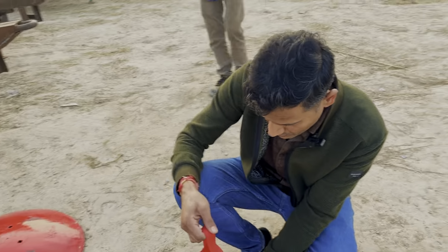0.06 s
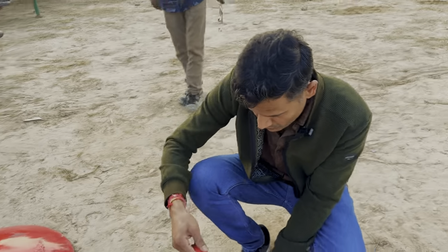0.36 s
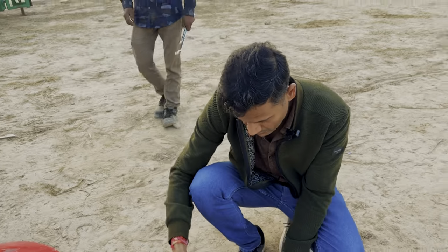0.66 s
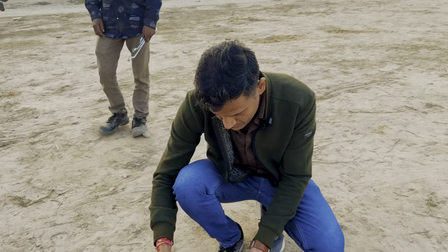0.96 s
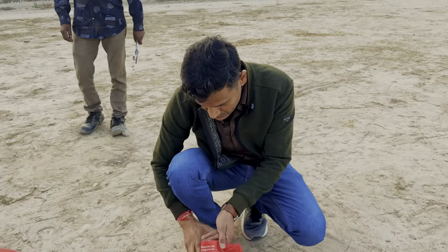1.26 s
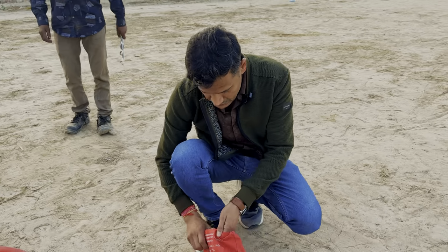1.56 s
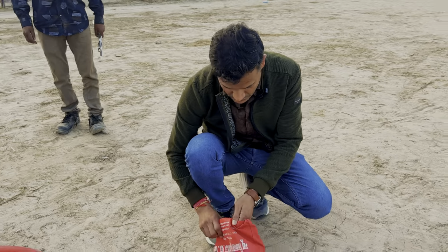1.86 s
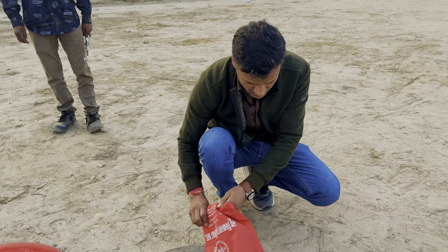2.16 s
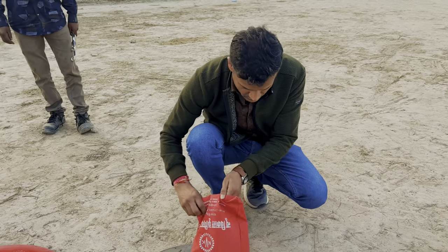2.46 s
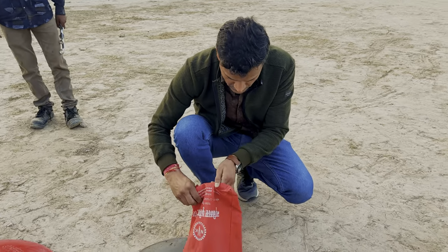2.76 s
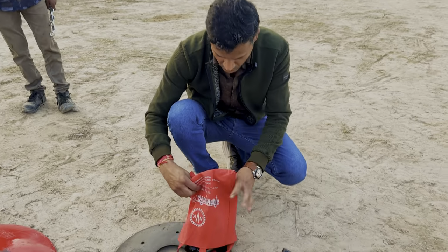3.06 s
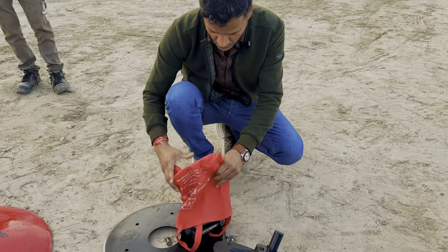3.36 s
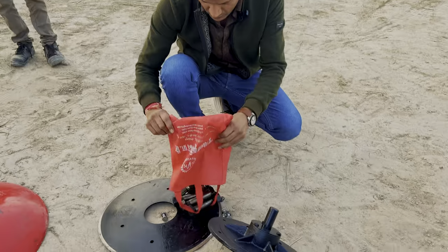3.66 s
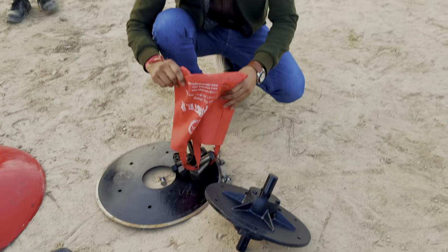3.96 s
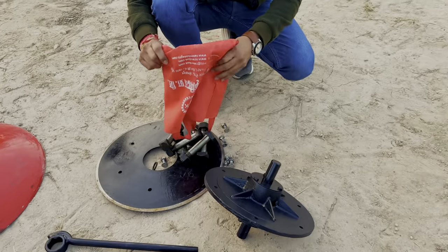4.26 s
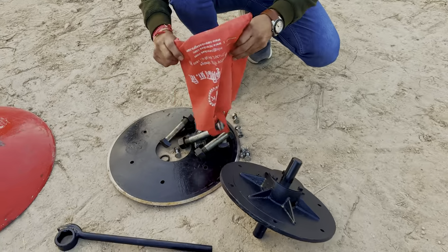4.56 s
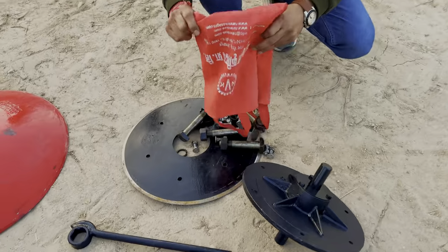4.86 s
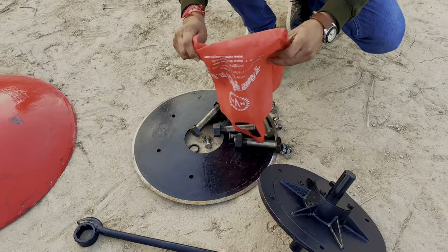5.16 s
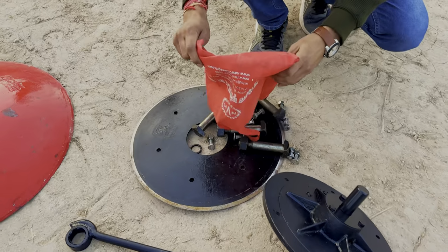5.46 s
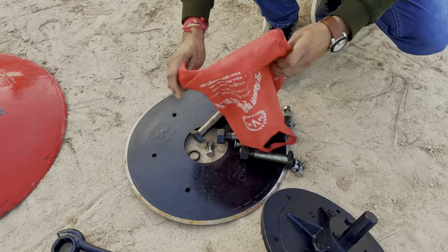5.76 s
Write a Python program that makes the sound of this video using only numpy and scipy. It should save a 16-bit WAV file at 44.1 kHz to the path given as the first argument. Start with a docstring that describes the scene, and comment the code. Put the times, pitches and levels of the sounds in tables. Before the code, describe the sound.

The sound is close and dry, over faint, steady outdoor air. A cloth bag is handled with a soft low bump at about 0.3 seconds. Nuts tick sharply inside it near 0.85 seconds, and the load slides with a rustle and a brief, thin, high squeak. Between 1.1 and 1.4 seconds the first steel pieces drop onto a steel disc, clinking and ringing briefly. After a near pause, a bright clink comes at 2.4 seconds, then heavier bolts clank from 2.7 to 3 seconds, followed by lighter clinks. At 3.7 seconds the bag rustles and squeaks again, and bolts, nuts and washers pour out in a dense, jingling clatter, loudest around 4.8 seconds. The ring shortens as the heap grows. After a short lull with soft handling bumps, a last burst of clanks falls from 5.3 to 5.7 seconds.

```python
"""Outdoors, on sandy ground: steel bolts, nuts and washers are shaken from a cloth bag onto a steel disc.
The load shifts and squeals in the bag; the pieces drop, chatter on the disc and on each other,
and set both ringing. The growing heap damps the ring. Handling adds soft bumps and a low rumble.
A limiter catches the loudest blows."""
import sys
import numpy as np
from scipy import signal
from scipy.fft import rfft, irfft, next_fast_len
from scipy.io import wavfile
from scipy.ndimage import uniform_filter1d, minimum_filter1d

SR = 44100
rng = np.random.default_rng(int(sys.argv[2]) if len(sys.argv) > 2 else 0)


def to_wav(sig):
    """Store sig (one row per channel, or 1-D mono) as 16-bit WAV at the path in sys.argv[1].

    Samples outside -1..1 are clipped; the rate is SR.
    """
    pcm = np.clip(np.atleast_2d(sig), -1, 1) * 32767
    pcm = np.round(pcm).astype(np.int16)
    wavfile.write(sys.argv[1], SR, pcm.T)  # frames by channels


N = 264642
RING_N = int(.55 * SR)   # samples per event
RING_T_S = np.arange(RING_N) / SR
GRAZE_S = .009   # first touch to landing

# outdoor air: (frequency [Hz], relative density [dB])
AIR_SPECTRUM = [(25, 1.5), (60, 0), (140, -2), (280, -5), (500, -7), (1000, -12), (1600, -19.5),
                (3200, -24), (5300, -32), (9000, -25.5), (15500, -30)]
# hands shift the bag: (start [s], length [s], level [dB])
BAG_GRIPS = [(.3, 0.079, -52), (.92, .32, -52.5), (2.04, .34, -51), (3.18, 0.18, -45.5)]
# handling bumps: (time [s], peak [dB])
BAG_BUMPS = [(0.202, -32.5), (0.312, -18.5), (1.118, -28), (1.156, -23.5), (1.674, -36.5), (1.699, -38),
             (2.286, -31), (2.719, -29), (2.768, -31), (3.162, -32.5), (4.779, -26), (4.888, -32.5),
             (5.128, -34), (5.495, -31), (5.652, -36), (5.773, -32.5)]
# load slides in the bag: (start [s], length [s], rustle level [dB])
LOAD_SLIDES = [(.38, 0.016, -63), (0.715, 0.072, -49.5), (0.887, 0.59, -46.5), (1.672, 0.023, -59),
               (2.258, 0.032, -49.5), (3.27, 0.043, -62), (3.67, .58, -46)]
# cloth rustle: (frequency [Hz], relative density [dB])
RUSTLE_SPECTRUM = [(300, -1), (1000, 2), (1900, 3.5), (2600, -14), (4500, 6.5), (8000, -6.5), (13000, -4.5),
                   (15500, -4)]
# steel on steel: (frequency [Hz], level at a usual slide [dB])
SQUEAL_TONES = [(8980, -51), (12620, -44.5)]
# a piece catches: (time [s], half width [s], level [dB], frequency [Hz])
SQUEAL_FLARES = [(.455, 0.016, -58, 8960), (0.991, 0.022, -28, 9020), (0.99, 0.029, -29, 12700),
                 (1.23, 0.013, -33.5, 12850), (2.254, .012, -49.5, 12370), (3.698, 0.0083, -19, 12980),
                 (4.287, 0.011, -23, 12700)]
# nuts tick in the bag: (time [s], peak [dB], frequency [Hz])
NUT_TICKS = [(0.1077, -43.5, 4390), (0.7004, -36, 8580), (0.7347, -28.5, 3700), (0.785, -28, 4700),
             (0.855, -12.5, 3680), (0.8666, -16, 3720), (0.9864, -31, 8500), (1.0331, -37, 8800),
             (1.6742, -40.5, 7540), (2.3275, -24.5, 3370), (3.9693, -11.5, 4600)]
# weak, dense modes of the heap: (frequency [Hz], relative density [dB])
HEAP_SPECTRUM = [(200, -22), (320, -13), (500, -4), (750, 6.5), (950, 8), (1250, -6.5), (1750, -9.5),
                 (2200, -10.5), (2600, -9), (3500, -14.5), (6000, -19.5), (9000, -15), (13000, -19.5),
                 (15500, -20)]
# large bolts: (frequency [Hz], relative level [dB], t60 [s])
BOLT_MODES = [(890, 2, .11), (2347, -3, .28), (2659, 0, .13), (2874, -3, .28), (3445, -5, .15),
              (4450, -2, .12), (4575, -3, .12), (4888, -6, .14), (5458, -6, .15), (6309, -13, .15),
              (7590, -12, .15), (7848, -4, .15), (8042, -6, .18), (8624, -5, .14), (8753, -6, .15),
              (9517, -4, .15), (9926, -7, .13), (10600, -8, .15), (11649, -6, .15), (12381, -10, .16),
              (13016, -8, .15), (14082, -7, .15), (14621, -5, .16), (15223, -11, .15)]
# steel disc: (frequency [Hz], relative level [dB], t60 [s])
DISC_MODES = [(735, -4, .14), (930, -2, .2), (1141, -1, .29), (1442, -5, .18), (1855, -7, .19),
              (2487, -1, .42), (2659, -2, .2), (3294, -5, .14), (4726, -12, .24), (5953, -15, .18),
              (6890, -11, .18), (7052, -11, .15), (8839, -4, .15), (9851, -6, .15), (10669, -10, .14),
              (10895, -5, .15), (11391, -13, .11), (11983, -4, .18), (12790, -10, .18), (13242, -10, .19),
              (15374, -12, .16)]
# disc under the growing heap: (time [s], longest t60 [s], disc over bolts [dB], heap gain [dB])
SURFACE = [(1.1, 0.42, 4.5, -1), (1.35, 0.36, -10, -2.5), (1.439, 0.24, 10, 2), (2.36, 0.26, 19, -2),
           (2.5, .22, 38.5, -5.5), (2.68, 0.15, 14, -4.5), (2.84, 0.12, 1, -5), (3.5, 0.14, -1.5, 2),
           (4.2, 0.087, 1, -2.5), (5.699, 0.055, -1.5, -3.5)]
# landings; weight sets clunk, hardness sets jingle: (time [s], clunk [dB], jingle [dB], chatter [s])
IMPACTS = [ (0.843, -42, -68, 0.024), (1.086, -23, -32.5, 0.028), (1.16, -24.5, -43, 0.022),
           (1.236, -29, -49, .028), (1.343, -21.5, -14.5, 0.011), (1.434, -35, -48, 0.023),
           (1.814, -46, -125, 0.0052), (2.278, -35.5, -90, 0.026), (2.36, -23.5, -13.5, 0.019),
           (2.479, -39, -61.5, .008), (2.52, -30.5, -52, .012), (2.649, -34, -37.5, .012),
           (2.686, -34.5, -32.5, .007), (2.7, -10.5, -26.5, 0.016), (2.757, -19.5, -34, 0.025),
           (2.838, -10.5, -23, .008), (2.907, -11.5, -28, 0.01), (2.931, -15.5, -30.5, 0.016),
           (3.011, -23.5, -54, 0.0078), (3.063, -47.5, -33, 0.0088), (3.141, -28, -47, 0.008),
           (3.373, -24.5, -28.5, 0.0036), (3.41, -31, -42.5, 0.0017), (3.471, -29, -30.5, 0.0048),
           (3.597, -44, -38, 0.015), (3.688, -33, -40, 0.011), (3.721, -32, -20, 0.023),
           (3.827, -25, -18.5, 0.011), (3.897, -31, -21.5, 0.0053), (3.918, -21.5, -24.5, 0.019),
           (3.981, -32.5, -33, .007), (4.005, -16.5, -23.5, 0.017), (4.048, -17.5, -26, .024),
           (4.089, -21, -29, .007), (4.148, -21, -19, 0.019), (4.177, -16, -21.5, 0.019),
           (4.23, -17, -20, 0.021), (4.348, -26.5, -17, .008), (4.368, -15.5, -22.5, .017),
           (4.432, -12, -17, 0.024), (4.461, -14.5, -22, 0.023), (4.606, -24, -55.5, 0.038),
           (4.687, -28, -30.5, 0.0029), (4.736, -8, -13.5, 0.0081), (4.762, -14.5, -16.5, 0.014),
           (4.805, -19, -29.5, 0.023), (4.861, -9.5, -18, 0.016), (5.108, -50, -85, 0.013),
           (5.298, -36, -85, .026), (5.366, -14.5, -19, 0.025), (5.419, -24, -22, 0.027),
           (5.515, -11, -20.5, 0.014), (5.547, -19.5, -21.5, 0.013), (5.638, -27.5, -26.5, 0.027),
           (5.664, -16, -22.5, .02), (5.789, -29, -71, .024)]


def from_db(db):
    """Decibels to gain."""
    return 10 ** (np.asarray(db) / 20)


def unit_rms(x):
    """Scale to rms 1."""
    return x / np.sqrt(np.mean(x ** 2) + 1e-20)


def band(x, kind, hz, order=2):
    """Causal Butterworth filter."""
    return signal.sosfilt(signal.butter(order, hz, kind, fs=SR, output="sos"), x)


def decay(t60_s):
    """Envelope losing 60 dB in t60_s."""
    return np.exp(-np.log(1000) * RING_T_S / t60_s)


def noise(spectrum, size):
    """Shaped noise, rms 1."""
    hz, db = np.transpose(spectrum)
    bins_hz = np.maximum(np.fft.rfftfreq(size, 1 / SR), 1)
    gain = from_db(np.interp(np.log(bins_hz), np.log(hz), db))
    return unit_rms(irfft(rfft(rng.standard_normal(size)) * gain, size))


def drift(rate_hz):
    """Slow random signal, rms 1."""
    return unit_rms(band(rng.standard_normal(N + SR), "low", rate_hz)[SR:])


def add(out, time_s, sound):
    """Mix a sound in at time_s."""
    at = max(round(time_s * SR), 0)
    out[at:at + len(sound)] += sound[:N - at]


def movement_db(moves, swell_db_per_s=260, fade_db_per_s=187.5):
    """Each bag movement swells, holds and fades."""
    t = np.arange(N) / SR
    levels_db = []
    for start_s, length_s, db in moves:
        swell_db = swell_db_per_s * np.maximum(start_s - t, 0)
        fade_db = fade_db_per_s * np.maximum(t - start_s - length_s, 0)
        levels_db.append(db - swell_db - fade_db)
    return np.max(levels_db, axis=0)


def near_echo(x, gain=.41, notch_spacing_hz=1025):
    """An inverted echo, about 1 ms late, cuts a comb of notches."""
    lag = round(SR / notch_spacing_hz)
    return x - gain * np.pad(x, (lag, 0))[:len(x)]


def ground_scatter(x, wet_db=-38, t60_s=.24, top_hz=3500):
    """Open ground adds a faint, dull tail."""
    tail = band(rng.standard_normal(RING_N), "low", top_hz) * decay(t60_s)
    return x + from_db(wet_db) * signal.fftconvolve(x, tail / np.linalg.norm(tail))[:N]


def outdoor_air(level_db=-59.5):
    """Steady, quiet air, mostly low."""
    return from_db(level_db) * noise(AIR_SPECTRUM, N)


def grip_rumble(bottom_hz=60, top_hz=130, lumps_db=4):
    """Hands work the bag: a lumpy, low rumble."""
    rumble = band(band(rng.standard_normal(N), "low", top_hz), "high", bottom_hz)
    return from_db(movement_db(BAG_GRIPS)) * unit_rms(rumble * from_db(lumps_db * drift(15)))


def handling_bumps(width_s=.01, lead_s=.035, bottom_hz=60, soft_top_hz=130, soft_db=-29):
    """Soft pushes a few cycles long; harder ones reach higher."""
    out = np.zeros(N)
    for time_s, db in BAG_BUMPS:
        top_hz = soft_top_hz * 2 ** (max(db - soft_db, 0) / 21.5)   # 21.5 dB per octave
        rumble = band(band(rng.standard_normal(RING_N), "low", top_hz, order=3), "high", bottom_hz)
        bump = rumble / np.cosh((RING_T_S - lead_s) / width_s)
        add(out, time_s - lead_s, from_db(db) * bump / np.abs(bump).max())
    return out


def cloth_rustle(slide_db, crinkles_per_s=260, crinkle_db=6, grain_db=3, hiss_gain=.6, rest_db=-76):
    """Steel slides on cloth: crinkles in a soft hiss."""
    onsets = rng.random(N) < crinkles_per_s / SR
    snaps = onsets * from_db(crinkle_db * np.minimum(rng.exponential(1, N), 3))
    crinkles = unit_rms(signal.fftconvolve(snaps, decay(t60_s=.0063))[:N])
    hiss = hiss_gain * from_db(grain_db * drift(40))
    envelope = (from_db(slide_db) + from_db(rest_db)) * unit_rms(crinkles + hiss)
    return envelope * noise(RUSTLE_SPECTRUM, N)


def squeal(hz, waver_hz=60, flutter_db=4):
    """Steel rubs steel: a thin, unsteady tone."""
    phase = 2 * np.pi * np.cumsum(hz + waver_hz * drift(110)) / SR
    return unit_rms(from_db(flutter_db * drift(35))) * np.sin(phase)


def sliding_load(usual_slide_db=-47.5, squeal_db_per_db=3.2):
    """The load rustles; it squeals on brisk slides and when a piece catches."""
    t = np.arange(N) / SR
    slide_db = movement_db(LOAD_SLIDES)
    out = cloth_rustle(slide_db)
    for hz, db in SQUEAL_TONES:
        out += from_db(db + squeal_db_per_db * (slide_db - usual_slide_db)) * squeal(hz)
    for time_s, half_width_s, db, hz in SQUEAL_FLARES:
        flare = np.exp(-.5 * ((t - time_s) / half_width_s) ** 2)
        out += from_db(db) * flare * squeal(hz)
    return out


def nut_ticks(tone_t60_s=.041, snap_t60_s=.023, tone_gain=.55):
    """Cloth stops a nut's ring at once: a snap and one short tone."""
    out = np.zeros(N)
    for time_s, db, hz in NUT_TICKS:
        snap = band(band(rng.standard_normal(RING_N), "high", hz=410), "low", hz=5800, order=1)
        tone = tone_gain * np.sin(2 * np.pi * hz * RING_T_S) * decay(tone_t60_s)
        tick = near_echo(snap * decay(snap_t60_s)) + tone
        add(out, time_s, from_db(db) * tick / np.abs(tick).max())
    return out


def struck_modes(modes, longest_t60_s, spread_db, detune):
    """Each blow hits a new spot: random mode strengths and signs, scattered pitches."""
    hz, db, t60_s = np.transpose(modes)
    strength, shift, side = rng.standard_normal((3, len(hz)))
    gains = from_db(db + spread_db * strength) * np.sign(side)
    phases = 2 * np.pi * np.outer(hz * (1 + detune * shift), RING_T_S)
    envelopes = decay(np.minimum(t60_s, longest_t60_s)[:, None])
    return gains @ (np.sin(phases) * envelopes)


def loose_pieces(count=3, gain_db=-7):
    """Similar bolts and nuts ring along, each at its own pitches."""
    return from_db(gain_db) * struck_modes(BOLT_MODES * count, longest_t60_s=.08, spread_db=2.5, detune=.05)


def heap_ring(ring_db=12, ring_t60_s=.11, crack_db=11, crack_t60_s=.0027, bottom_hz=270):
    """Contact crack, then the dense, short ring of the whole heap."""
    envelope = from_db(ring_db) * decay(ring_t60_s) + from_db(crack_db) * decay(crack_t60_s)
    dense_modes = noise(HEAP_SPECTRUM, next_fast_len(RING_N))[:RING_N]
    return band(dense_modes * envelope, "high", bottom_hz)


def steel_response(longest_t60_s, disc_db, heap_db, bottom_hz=230):
    """Impulse response of disc, bolts and heap; disc and bolts split the power."""
    disc_share = 1 / (1 + from_db(-disc_db) ** 2)
    disc = struck_modes(DISC_MODES, longest_t60_s, spread_db=2, detune=.00055)
    bolts = struck_modes(BOLT_MODES, longest_t60_s, spread_db=3.5, detune=.00087)
    heap = from_db(heap_db) * near_echo(loose_pieces() + heap_ring())
    ring = np.sqrt(2 * disc_share) * disc + np.sqrt(2 - 2 * disc_share) * bolts + heap
    return band(ring, "high", bottom_hz)


def chatter(chatter_s, clunk_db, touches_per_s=1400, uneven_db=3, landing_force=1.97, rebound_force=.79):
    """Contact force: a piece grazes its neighbours, lands and settles in uneven rebounds."""
    onsets = rng.random(RING_N) < touches_per_s / SR
    signs = np.sign(rng.standard_normal(RING_N))
    touches = onsets * signs * from_db(uneven_db * rng.standard_normal(RING_N))
    after_s = RING_T_S - GRAZE_S
    settle = np.exp(-(np.abs(after_s) / (1.086 * chatter_s)) ** 1.077)
    graze = min(from_db(-35 - clunk_db), .35)   # light pieces slide in, heavy ones drop clean
    force = touches * np.where(after_s < 0, graze * RING_T_S / GRAZE_S, rebound_force * settle)
    force[round(GRAZE_S * SR)] = landing_force
    return force


def clang_level_db(clunk_db, jingle_db, disc_db):
    """Mid band: heavy, hard pieces on the bare disc clang most."""
    large_bolt_db = np.interp(clunk_db, [-12, -10.5], [0, 8])
    return -6.5 + .45 * clunk_db + .49 * jingle_db + .3 * disc_db + large_bolt_db


def falling_pieces(clunk_top_hz=1800, jingle_bottom_hz=5500, attack_s=.02):
    """Chatter drives the steel; clunk, clang and jingle bands are each set by their attack rms."""
    out = np.zeros(N)
    landing = round(GRAZE_S * SR)
    attack = slice(landing, landing + int(attack_s * SR))
    times_s, *columns = np.transpose(SURFACE)
    for time_s, clunk_db, jingle_db, chatter_s in IMPACTS:
        longest_t60_s, disc_db, heap_db = [np.interp(time_s, times_s, column) for column in columns]
        response = steel_response(longest_t60_s, disc_db, heap_db)
        impact = signal.fftconvolve(chatter(chatter_s, clunk_db), response)[:RING_N]
        clunk = band(impact, "low", clunk_top_hz, order=5)
        clang = band(impact, "band", [clunk_top_hz, jingle_bottom_hz], order=4)
        jingle = band(impact, "high", jingle_bottom_hz, order=5)
        clang_db = clang_level_db(clunk_db, jingle_db, disc_db)
        for part, db in ((clunk, clunk_db), (clang, clang_db), (jingle, jingle_db)):
            add(out, time_s - GRAZE_S, from_db(db) * part / np.std(part[attack]))
    return out


def scene():
    """Steel, bag and handling over outdoor air; mono."""
    steel_and_bag = ground_scatter(falling_pieces() + nut_ticks() + sliding_load())
    return (steel_and_bag + handling_bumps() + grip_rumble() + outdoor_air())[None]


def record(dry, hold_s=.0015, cutoff_hz=15750):
    """Fast limiter at full scale, then a steep low-pass."""
    hold = round(hold_s * SR)
    needed_gain = 1 / np.maximum(np.abs(dry), 1)
    gain = uniform_filter1d(minimum_filter1d(needed_gain, hold), hold)
    lowpass = signal.ellip(10, .2, 80, cutoff_hz, fs=SR, output="sos")
    return signal.sosfilt(lowpass, dry * gain)


dry = scene()
out = record(dry)
to_wav(out)
```